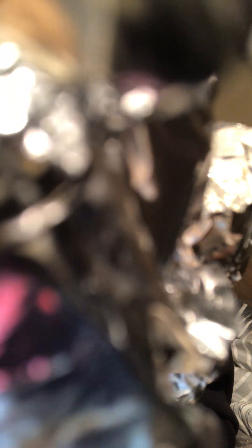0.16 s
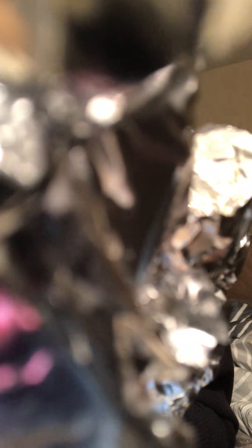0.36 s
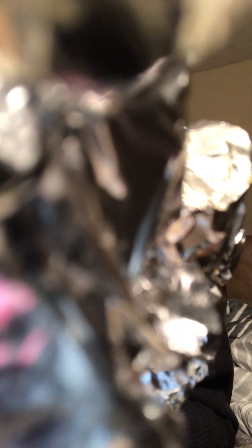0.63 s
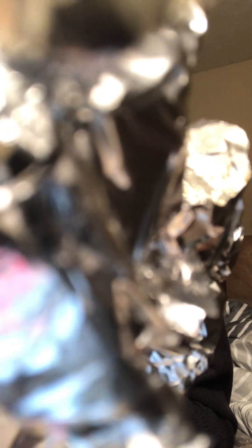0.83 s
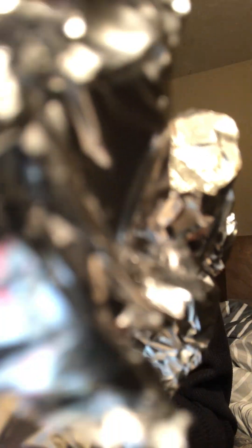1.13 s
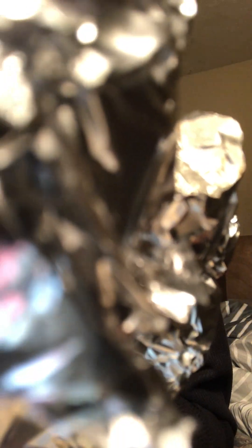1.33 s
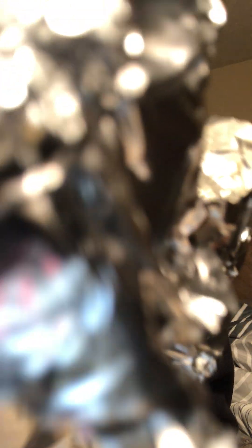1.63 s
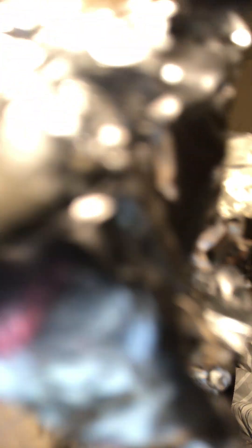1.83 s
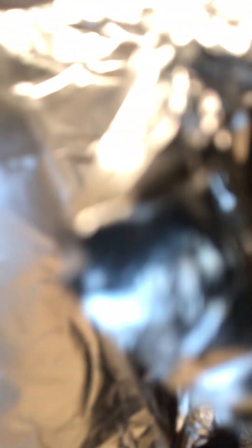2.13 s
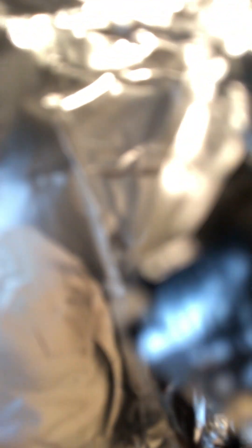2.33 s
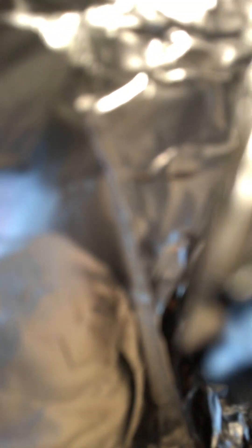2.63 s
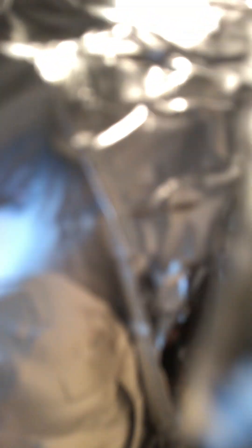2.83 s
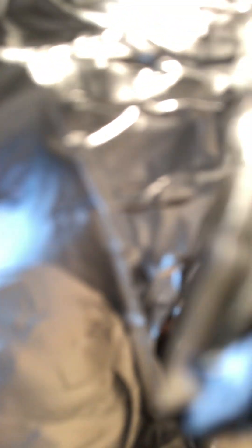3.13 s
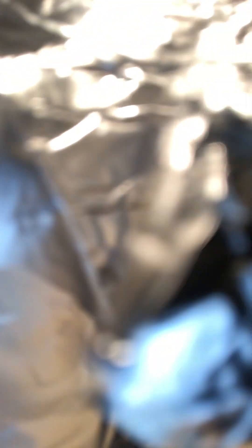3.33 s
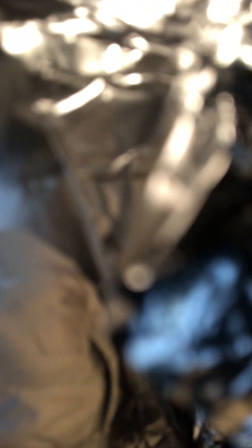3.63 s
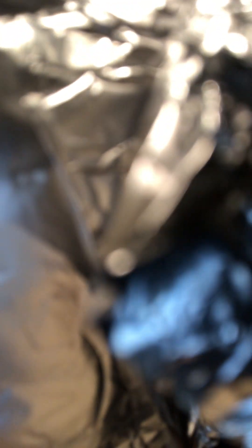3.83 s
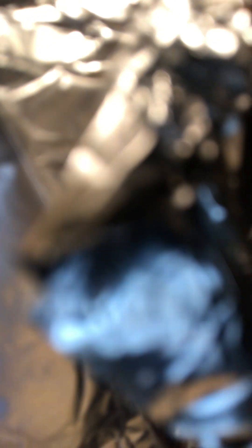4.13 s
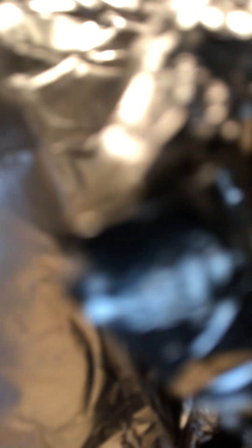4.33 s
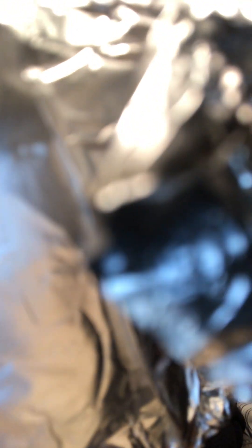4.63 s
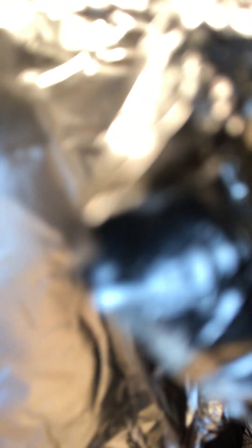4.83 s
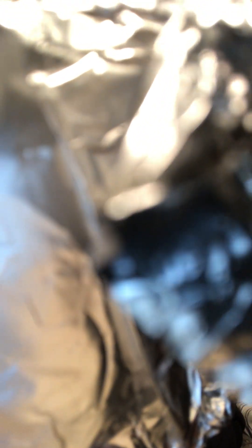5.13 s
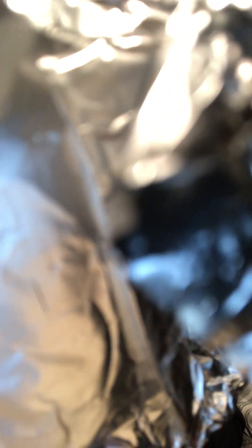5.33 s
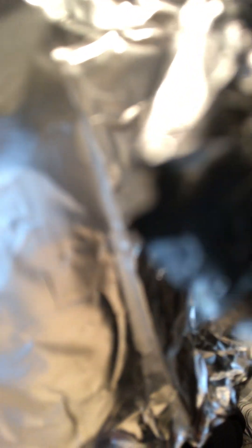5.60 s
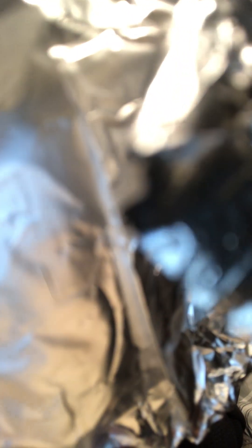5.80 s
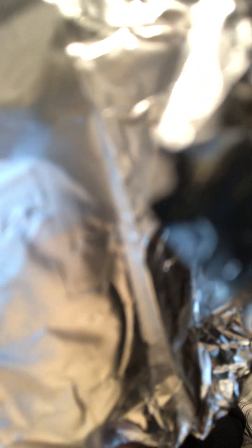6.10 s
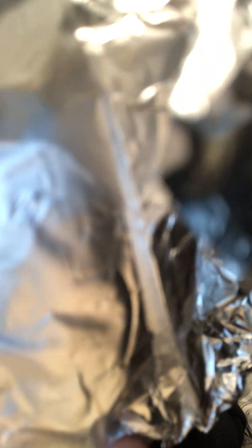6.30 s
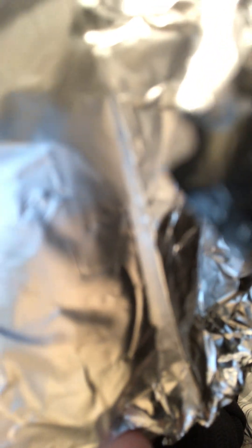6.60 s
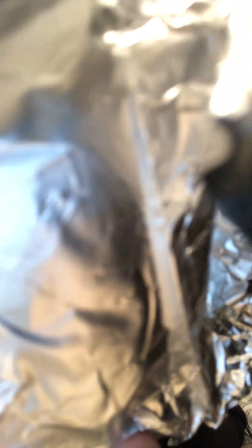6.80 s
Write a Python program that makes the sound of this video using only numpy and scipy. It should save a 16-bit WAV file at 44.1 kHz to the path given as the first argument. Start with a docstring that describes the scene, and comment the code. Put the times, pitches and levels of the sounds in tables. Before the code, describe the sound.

Foil wrapped round brittle chunks is crushed in bursts. Bright, crisp crackling mixes with hollow knocks, gritty crumbs and soft low thumps in the hands. Sparse breaks open it, activity thickens from about two to three and a half seconds, one strong crack follows, then light rustles die away. Close, dry, small indoor space with short reflections.

```python
"""In a small room, close to the microphone, foil wrapped round hard chunks of starch is squeezed in waves.
Creases buckle and chunks break: filtered noise bursts make snaps, hollow knocks and soft thumps.
Between them noise under random envelopes crackles as foil and grinds as crumbs; some facets ring as they flip.
A diffuse tail and low modes answer from the room; heavy breaks add sinking thuds and hums, and a low hum
from an earlier break still rings at the start."""
import sys
import numpy as np
from scipy import signal
from scipy.fft import rfft, irfft, next_fast_len
from scipy.io import wavfile
from scipy.ndimage import uniform_filter1d, map_coordinates

SR = 44100
rng = np.random.default_rng(int(sys.argv[2]) if len(sys.argv) > 2 else 0)


def to_wav(sig):
    """Store sig (one row per channel, or 1-D mono) as 16-bit WAV at the path in sys.argv[1].

    Samples outside -1..1 are clipped; the rate is SR.
    """
    pcm = np.clip(np.atleast_2d(sig), -1, 1) * 32767
    pcm = np.round(pcm).astype(np.int16)
    wavfile.write(sys.argv[1], SR, pcm.T)  # frames by channels


N = 306927  # samples, just under 7 s

# spectrum of creased foil: frequency_hz, relative_level_db
FOIL = [(700, -36), (1300, -6.5), (2200, 4.5), (2730, -2.5), (3300, 2.5), (4700, 0.5), (5500, -2.5),
        (6200, -1.5), (7700, -0.5), (8600, -16), (11000, -37)]
# spectrum of the foil's top octave: frequency_hz, relative_level_db
SHEEN = [(6500, -39.5), (8400, -4), (10000, -2.5), (12900, 0.5), (15500, -5), (17000, -11)]
# spectrum of the hollow packet and its crumbs: frequency_hz, relative_level_db
PACKET = [(150, -27.5), (280, -4), (370, 1), (520, 0), (680, 1), (850, -4), (1150, -7.5), (1400, -16),
          (2500, -45.5)]
# spectrum of the thump in the hands: frequency_hz, relative_level_db
THUMP = [(40, -25), (70, -10.5), (115, -10), (180, 2), (230, -10.5), (290, -0.5), (400, -10), (800, -60)]
# low standing waves of the room: frequency_hz, relative_level_db, t60_s
ROOM_MODES = [(64, -10.5, 0.24), (195.4, -17.5, 1), (282.7, -0.5, 0.34)]


def amp(db):
    """A level in decibels is twenty times the logarithm of the amplitude gain returned here."""
    return 10 ** (np.asarray(db) / 20)


def unit(x):
    """Normalisation: divide by the root mean square, so that the rms becomes 1."""
    return x / np.sqrt(np.mean(x ** 2) + 1e-20)


def sized(x, db):
    """Energy scaling: give x the energy of 20 ms of sound at that rms level."""
    return amp(db) * x * np.sqrt(.02 * SR / np.sum(x ** 2))


def along(points, hz):
    """Logarithmic frequency scale: interpolate (frequency_hz, value) points along it."""
    f, v = np.transpose(points)
    return np.interp(np.log(hz + 1), np.log(f + 1), v)


def wander(places):
    """Smooth random variation: a spline through one random knot per whole number."""
    return map_coordinates(rng.standard_normal(2048), [places], mode="wrap")


def coloured(x, points, ripple_db=0, ripple_hz=500):
    """Minimum-phase filtering: a folded cepstrum makes the spectrum, with random resonances, causal."""
    m = 2 * next_fast_len(len(x) // 2 + 2048)
    hz = np.fft.rfftfreq(m, 1 / SR)
    # narrow random resonances ripple_hz apart, plus humps six times as broad
    ripple = np.tanh(wander(hz / ripple_hz)) + .8 * np.tanh(wander(hz / (6 * ripple_hz)))
    cepstrum = irfft(np.log(amp(along(points, hz) + ripple_db * ripple)))
    cepstrum[1:m // 2] *= 2
    cepstrum[m // 2 + 1:] = 0
    return irfft(rfft(x, m) * np.exp(rfft(cepstrum)))[:len(x)]


def add(track, s, x):
    """Superposition: sum x into the track from time s, in seconds."""
    start = int(np.clip(round(s * SR), 0, N - 1))
    track[start:start + len(x)] += x[:N - start]


def background():
    """Stationary noise: a constant spectrum and strength give a faint steady bed."""
    # background spectrum: frequency_hz, relative_level_db
    quiet_spectrum = [(15, -43.5), (25, -20), (55, -1.5), (100, -3.5), (150, -7.5), (210, -8), (500, -15),
                      (1200, -22.5), (3900, -27), (16000, -37)]
    return amp(-70.0) * unit(coloured(rng.standard_normal(N), quiet_spectrum))


def jolts():
    """Transient excitation: heavy breaks give a thud sinking in pitch and a decaying hum of two room modes."""
    # heavy breaks that jolt the whole packet; the first row is the low hum still ringing
    # from an earlier break: start_s, thud_level_db, hum_gain_db
    thuds_and_hums = [(0, -65, -54.5), (0.298, -38, -58.5), (.386, -63, -38), (.723, -36, -41.5),
                      (1.712, -58.5, -42.5), (4.033, -47, -56)]
    track, t = np.zeros(N), np.arange(SR) / SR
    sink_hz = 54 + 150 * np.exp(-t / .024)
    thud_decay = np.exp(-t / 0.011) + amp(-23) * np.exp(-t / 0.089)
    thud = np.sin(2 * np.pi * np.cumsum(sink_hz) / SR) * (1 - np.exp(-t / 0.0046)) * thud_decay
    # only the two upper modes hum here
    modes = sum(amp(db - 60 * t / t60) * np.sin(2 * np.pi * hz * t) for hz, db, t60 in ROOM_MODES[1:])
    hum = (1 - np.exp(-t / 0.0049)) * modes
    for s, thud_db, hum_db in thuds_and_hums:
        add(track, s, sized(thud, thud_db) + amp(hum_db) * hum)
    return track


def stroke(t, start, length, release):
    """Exponential relaxation: one squeeze takes hold within milliseconds, holds, then lets go."""
    grip_s = 0.0051
    since = np.maximum(t - start, 0)
    return (1 - np.exp(-since / grip_s)) * np.exp(-np.clip((since - length) / release, 0, 30))


def pressure(t):
    """Incoherent power addition: the light hold and every squeeze sum as squares, for foil and starch."""
    # squeezes of the fingers: start_s, length_s, relative_foil_db, relative_starch_db
    squeezes = [(0.128, 0.15, -66, -58), (0.34, 0.024, -62, -47), (1.031, 0.13, -61.5, -58.5),
                (1.286, 0.15, -66, -57.5), (1.509, 0.17, -61, -56), (1.845, .22, -49.5, -44),
                (2.1, 0.27, -55.5, -49), (2.396, 0.12, -44, -38.5), (2.543, 0.074, -53.5, -49),
                (2.666, 0.24, -67.5, -49), (2.786, 0.064, -45.5, -45), (3.162, 0.21, -58.5, -44.5),
                (3.326, 0.073, -41.5, -43), (3.507, 0.092, -54, -51), (3.659, .15, -61, -50),
                (3.95, 0.086, -56.5, -47.5), (4.043, .14, -54, -48.5), (4.417, .11, -50, -46.5),
                (5.118, 0.032, -67, -58), (5.272, 0.066, -59.5, -57.5), (5.457, 0.22, -65.5, -59),
                (5.755, 0.068, -60.5, -54), (5.91, 0.074, -69.5, -66.5), (6.075, 0.069, -68, -67)]
    # the foil stops with the fingers; the crumbs settle more slowly
    foil_release_s, starch_release_s = 0.012, 0.026
    # between squeezes the hand keeps a light hold until it comes to rest
    hold_foil_db, hold_starch_db, rest_s = -81, -73.5, 6.15
    held = stroke(t, 0, rest_s, starch_release_s)
    foil, starch = amp(hold_foil_db) * held + 1e-9, amp(hold_starch_db) * held
    for start, length, foil_db, starch_db in squeezes:
        foil = np.hypot(foil, amp(foil_db) * stroke(t, start, length, foil_release_s))
        starch = np.hypot(starch, amp(starch_db) * stroke(t, start, length, starch_release_s))
    return foil, starch


def slides(t):
    """Sliding friction: foil passing over a chunk swells and fades as a Gaussian in time."""
    # slides: middle_s, half_length_s, relative_foil_db, relative_starch_db
    rubs = [(0.245, 0.0074, -53.5, -46), (1.083, 0.0092, -56.5, -44.5), (1.163, 0.006, -53.5, -53),
            (1.541, 0.011, -54.5, -41.5), (2.26, 0.013, -45, -46), (2.36, 0.011, -38, -34.5),
            (2.454, 0.023, -46, -33), (2.501, 0.015, -49.5, -33), (2.859, 0.011, -33.5, -35),
            (3.144, 0.009, -38, -46.5), (3.246, 0.014, -41.5, -47.5), (3.386, 0.007, -28.5, -39.5),
            (3.699, 0.008, -49, -59), (5.284, 0.0093, -60, -61), (6.071, 0.0097, -56, -55)]
    foil, starch = np.zeros((2, N))
    for middle, half, rub_db, grind_db in rubs:
        swell = np.exp(-np.minimum(((t - middle) / half) ** 2 / 2, 20))
        foil += amp(rub_db) * swell
        starch += amp(grind_db) * swell
    return foil, starch


def crinkles(rate, spread_db, life):
    """Shot noise: small bucklings at random moments, rate per second, each swell and die within life s."""
    chance, size = rng.random(N), rng.standard_normal(N)
    kicks = (chance < rate / SR) * amp(spread_db * np.clip(size, -2, 2)) ** 2
    t = np.arange(SR // 20) / SR
    pulse = np.exp(-t / life) * (1 - np.exp(-t / (0.7 * life)))
    power = np.abs(signal.fftconvolve(kicks, pulse ** 2)[:N])
    # the hand sets the mean strength; single bucklings stand out from it
    mean = np.abs(uniform_filter1d(power, size=1500))
    return unit(np.sqrt(power / (mean + 0.09 * power.mean())))


def shifting(points, ripple_db, ripple_hz, rate, count=5):
    """Changing resonance: steady noise fades between filters, rate knots/s, as the packet deforms."""
    t = np.arange(N) / SR
    shares = np.array([amp(10 * wander(t * rate)) for _ in range(count)])
    voices = np.array([unit(coloured(rng.standard_normal(N), points, ripple_db, ripple_hz))
                       for _ in range(count)])
    return np.sum(shares * voices, axis=0) / np.linalg.norm(shares, axis=0)


def squeeze():
    """Amplitude modulation: pressure and bucklings shape noise into foil crackle and crumb grinding."""
    # slack foil bending slowly: frequency_hz, relative_level_db
    slack_spectrum = [(500, -23), (1600, -1), (4500, -17.5)]
    t = np.arange(N) / SR
    foil, starch = pressure(t)
    slide_foil, slide_starch = slides(t)
    coarse = crinkles(rate=130, spread_db=4.5, life=.003)
    fine = crinkles(rate=1100, spread_db=4, life=.0015)
    crumbling = crinkles(rate=77, spread_db=3.0, life=0.0095)

    # grinding crumbs also rustle the foil around them
    rustled_foil = np.hypot(foil, amp(-26.5) * starch)
    crackle = np.hypot(rustled_foil * (coarse + 0.25), slide_foil * fine)
    grind = np.hypot(starch, amp(-3) * slide_starch) * unit(coarse + 1.3 * crumbling)

    # harder crushing sounds brighter; a light touch bends the foil softly, with a duller rustle
    force = np.hypot(foil, slide_foil)
    gloss = amp(-9) * (force / amp(-37.0)) ** .2
    softness = amp(-6) * (force / amp(-63.5)) ** -.25
    creased = shifting(FOIL, ripple_db=8.5, ripple_hz=285.3, rate=30)
    bright = shifting(SHEEN, ripple_db=0.5, ripple_hz=500, rate=27)
    dull = shifting(slack_spectrum, ripple_db=3, ripple_hz=200, rate=20)
    metal = crackle * (creased + gloss * bright + softness * dull)

    crumbs = grind * shifting(PACKET, ripple_db=5.5, ripple_hz=72.9, rate=20)
    rumble = amp(-12.5) * grind * unit(coloured(rng.standard_normal(N), THUMP))
    return metal, crumbs, rumble


def burst(life, rise, tail_db, tail, size=7000):
    """Fracture noise: a run of tiny breaks swells, decays exponentially and leaves a weaker ring."""
    t = np.arange(size) / SR
    decay = np.exp(-t / life) + amp(tail_db) * np.exp(-t / tail)
    return rng.standard_normal(size) * (1 - np.exp(-t / rise)) * decay


def snaps():
    """Sudden energy release: each break cracks the foil, knocks the packet, then thumps in the hands."""
    # breaks and bucklings: start_s, crack_db, knock_db, relative_thump_db, sheen_re_crack_db, life_s
    breaks = [(0.296, -38, -38, -39.5, -4, 0.0037), (0.3836, -39.5, -42, -44.5, -14, 0.0019),
              (0.587, -43, -45.5, -47.5, -11.5, 0.0034), (0.721, -32.5, -35, -44.5, -6.5, 0.0011),
              (0.744, -48, -50, -51.5, -7.5, .0047), (0.857, -63, -51.5, -55.5, -22, 0.0011),
              (0.901, -48, -49.5, -52.5, -9.5, 0.0023), (1.057, -49, -48, -44.5, -13, 0.0064),
              (1.5, -49.5, -51, -50, -11, .0046), (1.586, -47, -48.5, -46, -7, 0.0072),
              (1.613, -52.5, -52, -49.5, -7, .0025), (1.646, -45.5, -54.5, -54.5, -13, 0.0035),
              (1.711, -46, -48, -55.5, -13.5, 0.0021), (1.829, -39.5, -40.5, -37.5, -6.5, 0.0028),
              (1.85, -44.5, -56, -54, -5, 0.0021), (1.873, -34.5, -37.5, -41, -3.5, 0.0017),
              (1.895, -32.5, -33, -40, 0.5, 0.0049), (1.909, -45, -41.5, -54, 1, .0015),
              (1.935, -36.5, -30, -57.5, -4, 0.0051), (1.981, -38, -37.5, -51.5, -4, 0.0044),
              (2.089, -46, -46, -57, -8, 0.0046), (2.116, -53.5, -42.5, -66, -13, 0.0027),
              (2.143, -46, -47, -45.5, -2, 0.0031), (2.177, -52, -56.5, -53, -11, 0.0022),
              (2.205, -55, -63, -65.5, -9, 0.0022), (2.332, -45, -51.5, -67.5, 1, 0.0057),
              (2.402, -33.5, -39.5, -51.5, -2, 0.0038), (2.801, -41, -39.5, -44.5, -3, 0.0036),
              (2.939, -71.5, -53.5, -62, -18, 0.0055), (3.081, -49.5, -40.5, -47, -13, 0.0045),
              (3.128, -39, -35.5, -53, -14, 0.0021), (3.316, -47, -43.5, -46.5, -10.5, 0.0034),
              (3.359, -43, -37.5, -78, -1, 0.0017), (3.458, -58, -48.5, -49, -12, 0.007),
              (3.539, -52, -47, -47.5, 5, 0.0016), (3.816, -61, -67, -63, -7, 0.0017),
              (3.914, -70, -58, -72, -15, 0.002), (4.017, -45, -41.5, -45.5, -13.5, 0.0049),
              (4.033, -30.5, -31.5, -31.5, -3.5, 0.0057), (4.046, -38, -50, -54, -4.5, 0.006),
              (4.085, -44, -42, -64, -11, 0.0076), (4.144, -40.5, -40, -60, -11.5, .0022),
              (4.406, -34.5, -41, -44, -5, 0.0082), (4.517, -47.5, -55, -49, -11.5, 0.003),
              (4.639, -59.5, -62, -56.5, -15, 0.0059), (4.752, -65.5, -50.5, -65, -8, .0037),
              (4.806, -34.5, -41.5, -59.5, -9, 0.0016), (4.938, -45, -53, -54.5, -7.5, 0.0023),
              (5.342, -58.5, -57, -59, -11, 0.0049), (5.456, -61, -62.5, -61, -15, 0.011),
              (5.544, -52, -52.5, -47, -9.5, 0.0061), (5.769, -58.5, -67, -53.5, -5, 0.0059),
              (6.038, -47.5, -55, -47.5, -2.5, 0.0047), (6.887, -70.5, -70, -72, -11, .004)]
    thump_delay_s = 0.0023
    foil, packet, thumps = np.zeros((3, N))
    for s, crack_db, knock_db, thump_db, top_db, life in breaks:
        # every facet of foil has resonances of its own
        crack = burst(life, rise=1.7 * life, tail_db=-27, tail=0.0082)
        crack = coloured(crack, FOIL, ripple_db=4.5, ripple_hz=342.0)
        sheen = burst(1.1 * life, rise=0.7 * life, tail_db=-29, tail=.011)
        sheen = coloured(sheen, SHEEN, ripple_db=7.5, ripple_hz=573)
        add(foil, s, sized(unit(crack) + amp(top_db) * unit(sheen), crack_db))

        knock = burst(0.0087 + 0.26 * life, rise=0.35 * life, tail_db=-18, tail=0.022)
        knock = coloured(knock, PACKET, ripple_db=1.5, ripple_hz=89.9)
        add(packet, s, sized(knock, knock_db))

        thump = coloured(burst(life=0.016, rise=0.012, tail_db=-25.5, tail=0.022), THUMP)
        add(thumps, s + thump_delay_s, sized(thump, thump_db))
    return foil, packet, thumps


def tings():
    """Damped free vibration: a flipping facet or pocket rings near one pitch for a few milliseconds."""
    # taut facets and pockets: start_s, pitch_hz, level_db
    facets = [(0.297, 7670, -35), (.7215, 7960, -40), (.7225, 812, -35.5), (.857, 2270, -56),
              (1.896, 7500, -39.5), (1.91, 679, -39.5), (2.146, 6080, -43.5), (2.402, 12700, -37)]
    track, t = np.zeros(N), np.arange(SR // 10) / SR
    for s, hz, db in facets:
        cycles = hz * t
        decay = np.exp(-t / (0.0034 + 2.9 / hz)) + amp(-25.0) * np.exp(-t / .007)
        # the phase strays slightly, so the tone is not perfectly pure
        phase = 2 * np.pi * cycles + .5 * wander(cycles / 12 % 2000)
        add(track, s, sized((1 - np.exp(-cycles / 3)) * decay * np.sin(phase), db))
    return track


def room(x):
    """Diffuse reverberation: convolution with noise whose decay time depends on frequency."""
    # reverberation: frequency_hz, t60_s
    decay_times = [(100, 0.064), (500, 0.089), (1500, 0.14), (5000, 0.057), (15000, 0.015)]
    hz, t, z = signal.stft(rng.standard_normal(SR // 2), SR, nperseg=256)
    decay = amp(-60 * t / along(decay_times, hz)[:, None])
    tail = signal.istft(z * decay, SR, nperseg=256)[1]
    tail *= 1 - np.exp(-np.arange(len(tail)) / (0.0024 * SR))
    return signal.fftconvolve(x, tail / np.linalg.norm(tail))[:N]


def boom(x):
    """Modal resonance: the room's low standing waves build up under the input and hum on."""
    t = np.arange(SR) / SR
    ring = np.zeros(SR)
    for hz, db, t60 in ROOM_MODES:
        # a slow decay builds up longer, so each mode is scaled to about unit gain before its level
        balance = 2 * np.log(1000) / (t60 * SR)
        ring += amp(db - 60 * t / t60) * np.sin(2 * np.pi * hz * t) * balance
    return signal.fftconvolve(x, ring)[:N]


def scene():
    """Direct and reverberant sound: the close packet, the room's answer and the steady background."""
    metal, crumbs, rumble = squeeze()
    foil, packet, thumps = snaps()
    low = amp(-1.0) * thumps + rumble
    close = foil + packet + tings() + amp(-4.5) * (metal + crumbs) + low
    reverberant = amp(-14.5) * room(close) + amp(2.0) * boom(low)
    return (close + jolts() + reverberant + background())[None]


def record(dry):
    """Band limiting: the microphone sheds the deepest bass, the recorder all above a steep top edge."""
    low_hz, top_hz = 42, 15900
    thin = signal.sosfilt(signal.butter(3, low_hz, "highpass", fs=SR, output="sos"), dry)
    m = next_fast_len(N + 8192)
    hz = np.fft.rfftfreq(m, 1 / SR)
    return irfft(rfft(thin, m) / np.sqrt(1 + (hz / top_hz) ** 170), m)[:, :N]


dry = scene()
out = record(dry)
to_wav(out)
```